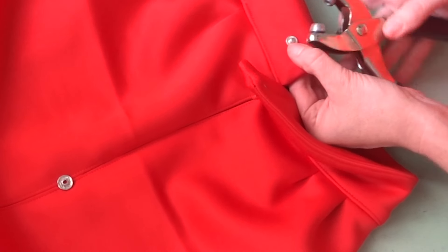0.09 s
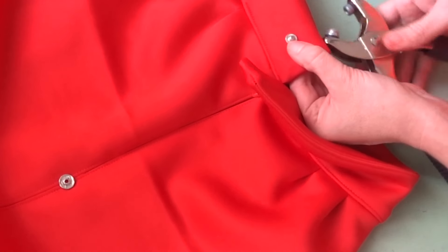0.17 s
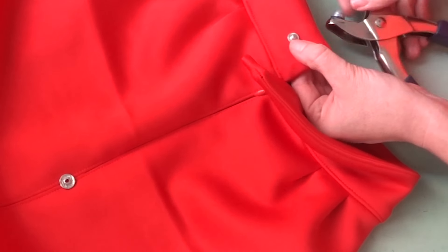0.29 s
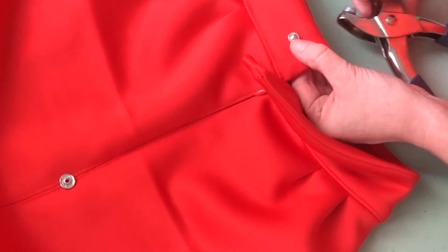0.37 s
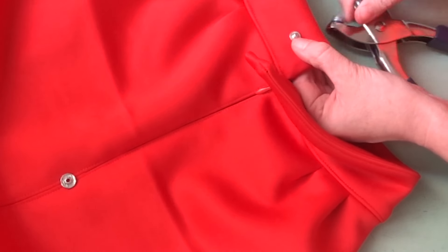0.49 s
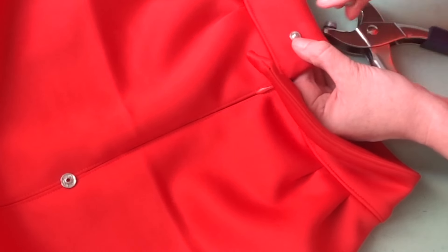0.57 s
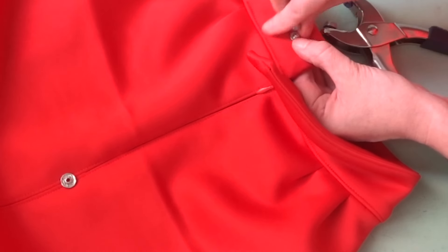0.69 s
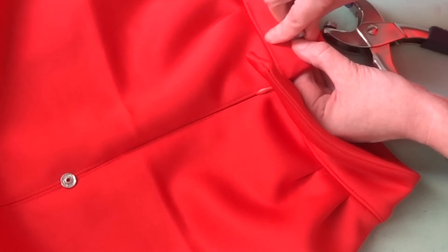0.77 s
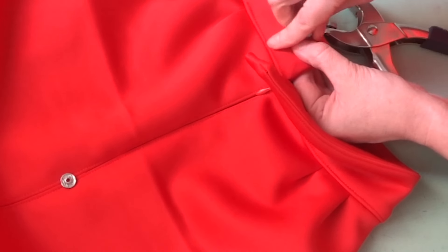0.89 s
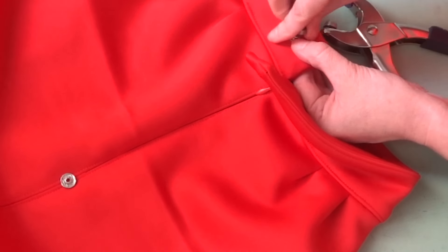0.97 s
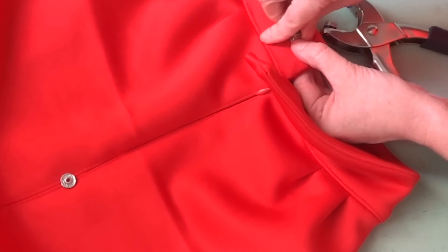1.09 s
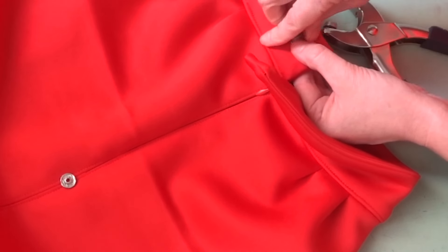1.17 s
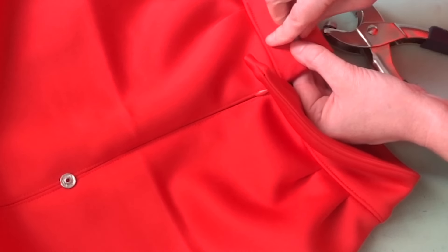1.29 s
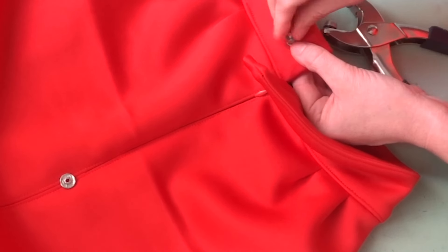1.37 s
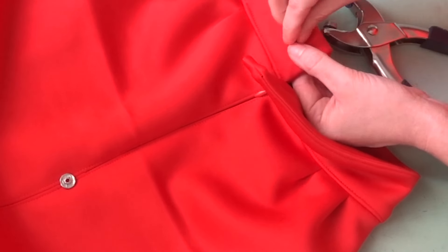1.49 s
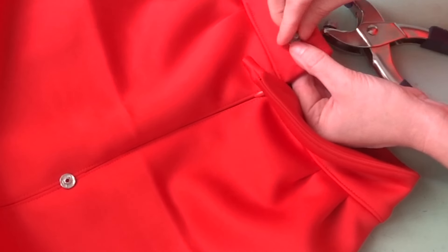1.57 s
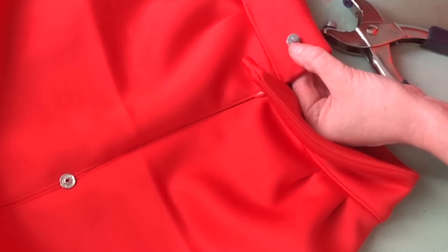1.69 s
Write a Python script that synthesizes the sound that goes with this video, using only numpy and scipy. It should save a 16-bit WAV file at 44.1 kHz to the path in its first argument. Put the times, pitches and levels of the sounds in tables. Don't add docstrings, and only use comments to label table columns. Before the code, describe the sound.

Steel pliers are put down on a table: a firm bright knock at 0.25 s, a lighter duller one at 0.38, the loudest, fuller one at 0.57, each with short board ring and room echo. Soft neoprene rubbing and tiny high metal ticks surround them. From about 1.0 s fingers rub again, strongest near 1.1, with a squeak around 1.75, over faint low hum and rumble.

```python
import sys
import numpy as np
from scipy import signal
from scipy.fft import rfft, irfft
from scipy.io import wavfile
from scipy.ndimage import uniform_filter1d, minimum_filter1d

SR = 44100
rng = np.random.default_rng(int(sys.argv[2]) if len(sys.argv) > 2 else 0)


def bounce(signal):
    frames = np.transpose(np.atleast_2d(signal))
    limited = np.clip(frames, -1, 1)
    pcm = np.round(limited * 32767).astype(np.int16)
    wavfile.write(sys.argv[1], SR, pcm)


def elevation(decibels):
    levels = np.asarray(decibels, float)
    return 10 ** (levels / 20)


N = 77175
t = np.arange(N) / SR
BANDS_HZ = 28 * 2 ** np.arange(0, 9.4, .5)


def at(table, hz):
    table = np.array(table, float)
    return np.interp(np.log(hz), np.log(table[:, 0]), table[:, 1])


def unit(x):
    return x / np.sqrt(np.mean(x ** 2))


def bins_hz(length):
    return np.maximum(np.fft.rfftfreq(length, 1 / SR), 1)


def shape(x, colour):
    gain = elevation(at(colour, bins_hz(x.shape[-1])))
    return irfft(rfft(x) * gain, x.shape[-1])


def wide(noise):
    # f/Hz, level/dB
    side_colour = [(60, -28), (200, -29), (500, -20), (1300, -10.5), (2400, -6.5), (4400, -4.5), (8000, -1),
                   (15000, 2.5)]
    side = shape(noise[1], side_colour)
    return np.array([noise[0] + side, noise[0] - side])


def split(x):
    octave = np.log2(bins_hz(x.shape[-1]))
    spec = rfft(x)
    bands = []
    for hz in BANDS_HZ:
        weight = np.clip(1 - 2 * abs(octave - np.log2(hz)), 0, 1)
        bands.append(irfft(spec * weight, x.shape[-1]))
    return bands


def walk(rate):
    hold = int(SR / rate)
    steps = np.repeat(rng.standard_normal(N // hold + 1), hold)
    return 0.59 * uniform_filter1d(uniform_filter1d(steps, hold), hold)[:N]


def resonance(x, hz, width):
    return signal.lfilter(*signal.iirpeak(hz, hz / width, fs=SR), x)


def rings(modes, u):
    return sum(elevation(db - 60 * u / t60) * np.sin(2 * np.pi * hz * u) for hz, db, t60 in modes)


def hum():
    # f/Hz, level/dB
    hum_colour = [(15, -67), (25, -32), (55, -26), (200, -4.5), (416, -7), (531, -6.5), (695, -11),
                  (1020, -18), (16000, -33.5)]
    # f/Hz, width/Hz, level/dB
    drones = [(70.6, 4, -75.5), (199, 20, -68.5), (610, 46, -73.5)]
    hum_db, steady_db = -61, -1
    bands = split(unit(shape(wide(rng.standard_normal((2, N))), hum_colour)))
    out = elevation(hum_db) * sum(band * elevation(0.4 * walk(7.4)) for band in bands)
    for hz, width, db in drones:
        breathing = unit(resonance(rng.standard_normal(N), hz, width))
        steady = elevation(steady_db + 3.7 * walk(12)) * np.sin(2 * np.pi * hz * t)
        out = out + elevation(db) * (breathing + steady)
    return out


def rumble():
    # t/s, length/s, level/dB
    creeps = [
        (0.73, 0.2, -69),
        (1.03, .06, -77),
        (1.17, .08, -83),
        (1.62, 0.098, -80),
    ]
    top_hz, floor_db = 59.5, -84
    low_pass = signal.butter(2, top_hz, fs=SR, output="sos")
    mid, side = signal.sosfilt(low_pass, rng.standard_normal((2, N)))
    low = unit(np.array([mid + .25 * side, mid - .25 * side]))
    level = elevation(floor_db)
    for s, length, db in creeps:
        level = level + elevation(db) * np.exp(-((t - s) / length) ** 2 * 4)
    return low * level


def cloth():
    # t/s, level/dB, brightness/dB per octave
    strokes = [(0, -65.5, -5), (0.099, -54, -2.5), (0.181, -61, -5), (0.194, -51.5, -1), (.5, -55.5, -2.5),
               (.8, -67, 3.5), (.955, -73.5, -13.5), (0.973, -55, -1.5), (1.053, -54.5, 1),
               (1.076, -44.5, 1), (1.1, -47.5, 1), (1.17, -58, -1), (1.271, -55.5, 1), (1.36, -66, 2),
               (1.53, -70, -7), (1.563, -56, 0), (1.722, -69.5, 0), (1.75, -54, -4)]
    # f/Hz, level/dB
    cloth_colour = [(180, -16), (300, -13), (331, -5.5), (486, -8), (634, -3), (994, -1.5), (3700, -6),
                    (9880, -19.5), (16000, -41)]
    grain_db, flicker_db = 1.6, 2.2
    when, db, tilt = np.array(strokes, float).T
    grains = rng.standard_normal((2, N)) * elevation(grain_db * rng.exponential(size=N))
    bands = split(unit(shape(wide(grains), cloth_colour)))
    shared = 0.85 * walk(40)
    slope = np.interp(t, when, tilt)
    rub = 0
    for band, hz in zip(bands, BANDS_HZ):
        octaves = np.log2(max(hz, 400) / 2000)
        rub = rub + band * elevation(slope * octaves + flicker_db * walk(25) + shared)
    return rub * elevation(np.interp(t, when, db))


def squeaks():
    # t/s, length/s, f/Hz, level/dB
    catches = [
        (0.12, .06, 1250, -61.5),
        (.126, .012, 10800, -59),
        (0.028, 0.26, 480, -63.5),
        (1.196, 0.13, 770, -64),
        (0.728, 0.175, 7100, -72),
        (1.2, 0.14, 2000, -61),
        (1.294, 0.13, 5200, -69),
        (1.516, 0.089, 2030, -60.5),
        (1.577, 0.076, 2800, -67),
        (1.713, 0.074, 1180, -45.5),
    ]
    out = 0
    for s, length, hz, db in catches:
        tone = unit(resonance(wide(rng.standard_normal((2, N))), hz, hz * .09))
        swell = np.sin(np.pi * np.clip((t - s) / length, 0, 1))
        out = out + elevation(db) * tone * swell
    return out


def ticks(echo):
    # t/s, level/dB, f/Hz, t60/s
    touches = [(0.069, -49, 4270, 0.0076), (0.189, -51, 3000, .01), (0.386, -49, 9500, 0.0196),
               (0.4, -53, 10300, .015), (0.451, -50, 10100, .015), (0.4505, -57, 5560, 0.0092),
               (.4655, -58, 10550, .015), (0.5298, -52.5, 5900, 0.0093), (0.557, -54, 12500, 0.018),
               (0.574, -41.5, 10840, 0.029), (1.176, -58, 10900, .02)]
    room_db = -29.5
    out = np.zeros(N)
    for s, db, hz, t60 in touches:
        u = np.maximum(t - s, 0)
        noise = rng.standard_normal((2, N))
        ring = unit(resonance(noise[0], hz, hz * .22)) * elevation(-60 * u / t60)
        click = np.diff(noise[1], prepend=0) * np.exp(-u / .0008) * .25
        out += (t >= s) * elevation(db - 1) * (ring + click)
    return out + elevation(room_db) * signal.fftconvolve(echo, out[None], axes=1)[:, :N]


def room():
    # f/Hz, t60/s
    room_decay = [(100, .25), (400, 0.18), (1000, 0.19), (3000, 0.26), (8000, 0.19), (16000, 0.18)]
    late_db, late_t60_s, build_s = -33, 0.87, 0.0013
    u = t[:SR // 2 + SR // 4]
    bands = split(wide(rng.standard_normal((2, len(u)))))
    late = elevation(late_db - 60 * u / late_t60_s)
    echoes = sum(band * (elevation(-60 * u / at(room_decay, hz)) + late) for band, hz in zip(bands, BANDS_HZ))
    return echoes * (1 - np.exp(-u / build_s))


def contact(colour):
    cep = irfft(np.log(elevation(at(colour, bins_hz(4096)))))
    cep[1:2048] *= 2
    cep[2049:] = 0
    pulse = irfft(np.exp(rfft(cep)))[:2048]
    return pulse / np.sqrt(np.sum(pulse ** 2))


def knocks(echo):
    knock_times = [
        .245,
        .378,
        .5681,
    ]
    # level/dB, ring/dB, crack/dB, hold/s
    knock_levels = [
        (-15.5, -5, -8.5, 0.0079),
        (-22.5, -5.5, -2.5, 0.005),
        (-8, -4.5, -9, 0.036),
    ]
    # f/Hz, level/dB
    contact_colours = [
        [(200, -19.5), (400, -16.5), (520, -9.5), (1100, -8), (2200, -13), (4500, -25.5), (5300, -37),
         (16000, -49)],
        [(150, -14.5), (510, -8), (1200, -10), (1700, -12), (2500, -24), (5000, -40.5), (9000, -55.5),
         (16000, -63)],
        [(190, -19), (385, -17.5), (450, -2), (850, 0), (1700, -8.5), (2600, -22), (6000, -35), (16000, -46.5)],
    ]
    # f/Hz, level/dB, t60/s
    thud_modes = [
        [(1244, 2, 0.036), (3000, -3, 0.022), (3830, -8, 0.019), (4400, -6, 0.015), (6000, -11.5, 0.014)],
        [(940, -2, 0.0088), (3970, -31, 0.0044)],
        [(726, 6.5, .02), (3200, -12, 0.0087), (5900, -16, 0.007)],
    ]
    snap_levels = [
        -12.5,
        -13,
        -26.5,
    ]
    board_pitches = [214, 450, 510, 624, 704, 775, 858, 994, 1070, 1239, 1459, 1513, 1645, 2256]
    # t60/s, then level/dB in first, second, third knock
    board_modes = [(0.26, -8, -8.5, -10.5), (0.21, -10.5, -14, -6.5), (0.23, -0.5, -1, -8),
                   (0.22, -5, -2, -4.5), (0.26, -11.5, -5, -5), (0.34, -16, -24, -9),
                   (0.19, -19.5, -18.5, -2), (0.23, -21, -11, -4.5), (0.2, -0.5, 0, -6),
                   (0.18, 2, -2, -5.5), (0.2, -4, -0.5, -11.5), (0.15, 1.5, -5, -16), (0.2, -9, -6, -9.5),
                   (0.26, -6, -13, -28)]
    # f/Hz, level/dB, t60/s
    steel_modes = [(625, -45.5, 1.35)]
    crack_s, snap_s, beat_db, knock_low_hz = 0.0034, .0011, 4.5, 125.5

    out = np.zeros((2, N + SR))
    u = t[:echo.shape[1]]
    for k, (db, ring_db, crack_db, hold) in enumerate(knock_levels):
        crack = wide(rng.standard_normal((2, len(u)))) * np.exp(-u / crack_s) * elevation(crack_db + 10.5)
        pulse = contact(contact_colours[k])
        dense = signal.fftconvolve(echo + crack, pulse[None], axes=1)[:, :len(u)]
        ring = 0
        for hz, mode in zip(board_pitches, board_modes):
            beating = elevation(beat_db * walk(30)[:len(u)])
            ring = ring + rng.choice([-1, 1]) * rings([(hz, mode[k + 1], mode[0])], u) * beating
        held = elevation(-180 * np.maximum(hold - u, 0))
        body = (dense + elevation(ring_db) * ring * (1 - np.exp(-u / 0.0019))) * held
        snap = resonance(wide(rng.standard_normal((2, len(u)))), 6970, 8000)
        snap = snap * np.exp(-u / snap_s) * elevation(snap_levels[k])
        thud = rings(thud_modes[k], u) * (1 - np.exp(-u / 0.00057))
        i = int(knock_times[k] * SR)
        out[:, i:i + len(u)] += elevation(db) * (body + snap - thud)
    steel = rings(steel_modes, np.maximum(t - knock_times[2], 0)) * elevation(1.9 * walk(25))
    low_cut = signal.butter(4, knock_low_hz, "high", fs=SR, output="sos")
    return signal.sosfilt(low_cut, out[:, :N] + steel)


def scene():
    left_db = 0.4
    echo = room()
    table_top = knocks(echo) + ticks(echo) + cloth() + squeaks()
    balance = elevation(np.array([[left_db], [-left_db]]) / 2)
    return table_top * balance + hum() + rumble()


def roll_off(x):
    return signal.sosfilt(signal.butter(12, 16640, fs=SR, output="sos"), x)


def record(dry):
    limit, limit_s = .56, .004
    top_hz, top_drop_db = 15700, 30
    k = int(limit_s * SR)
    peak = np.abs(dry).max(axis=0) + 1e-9
    gain = uniform_filter1d(minimum_filter1d(np.minimum(1, limit / peak), k), k)
    top_cut = signal.ellip(6, .2, top_drop_db, top_hz, fs=SR, output="sos")
    mix = signal.sosfilt(top_cut, dry * gain)
    return roll_off(mix)


dry = scene()
out = record(dry)
bounce(out)
```